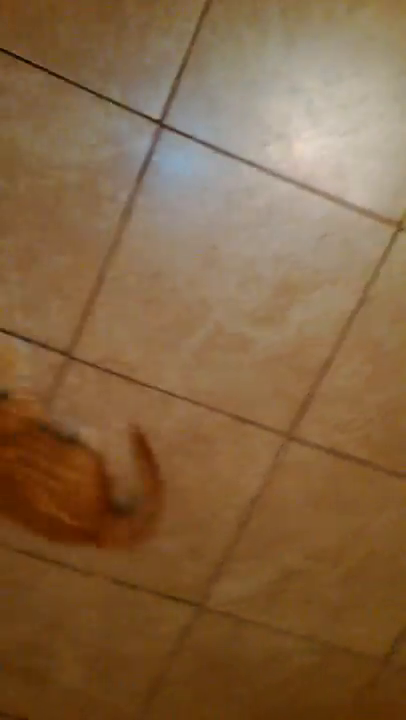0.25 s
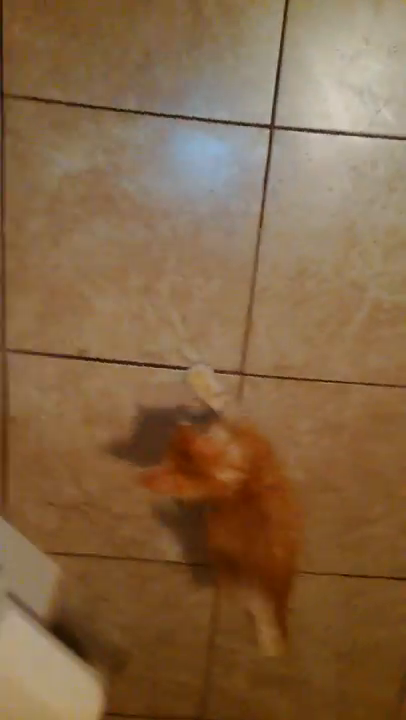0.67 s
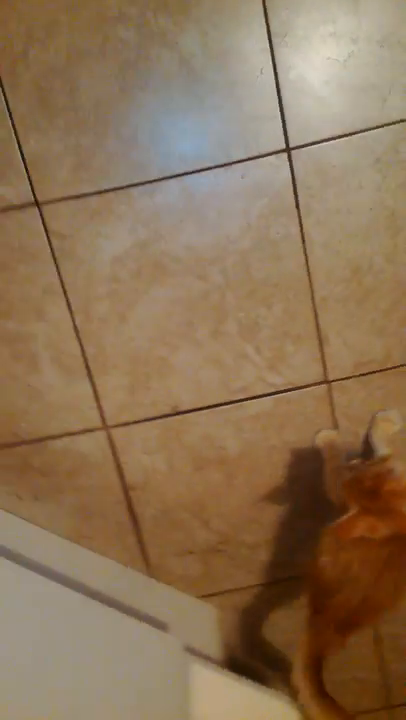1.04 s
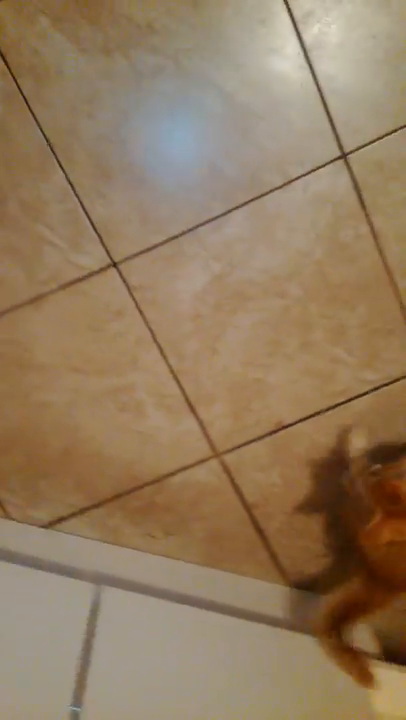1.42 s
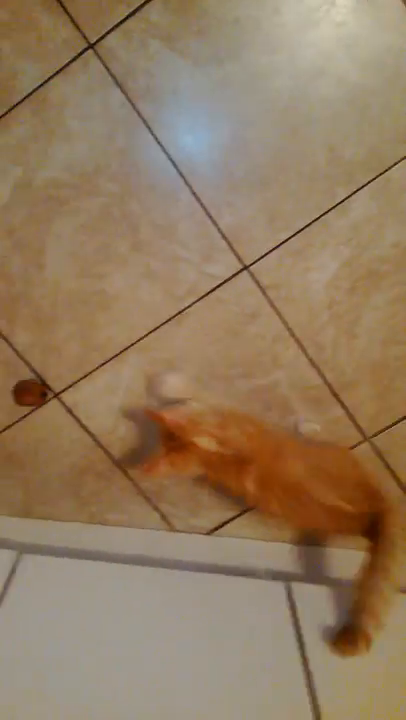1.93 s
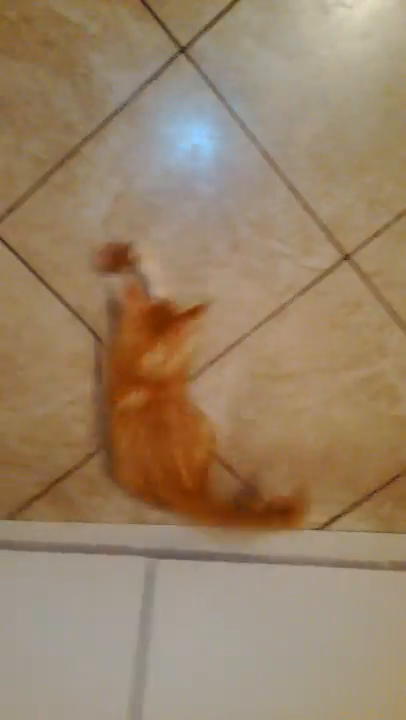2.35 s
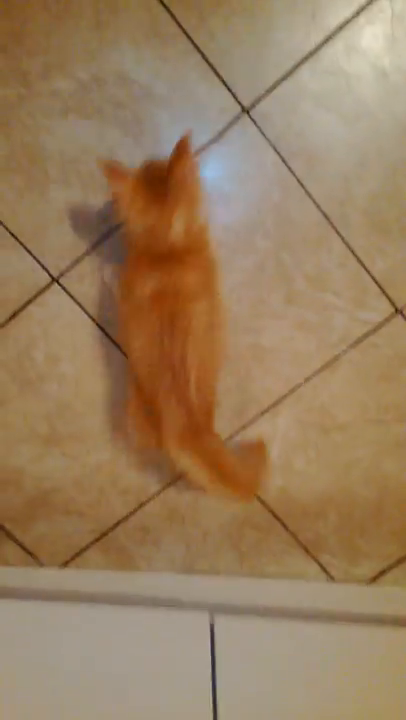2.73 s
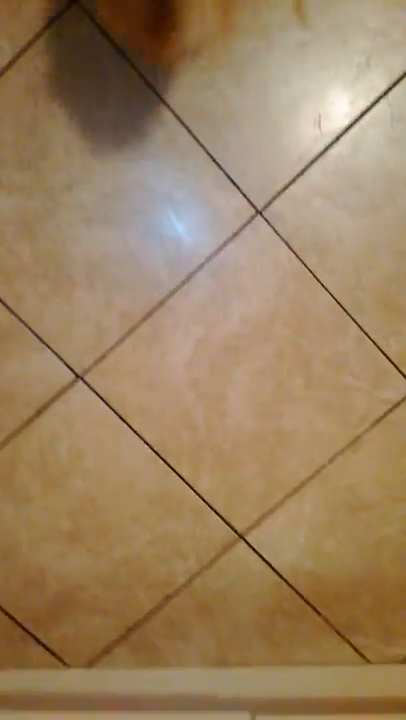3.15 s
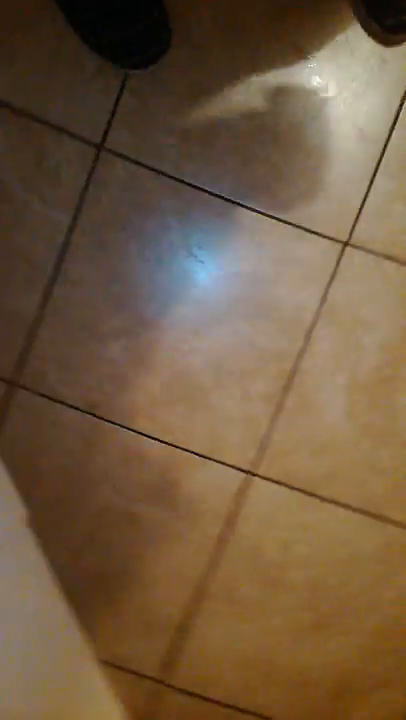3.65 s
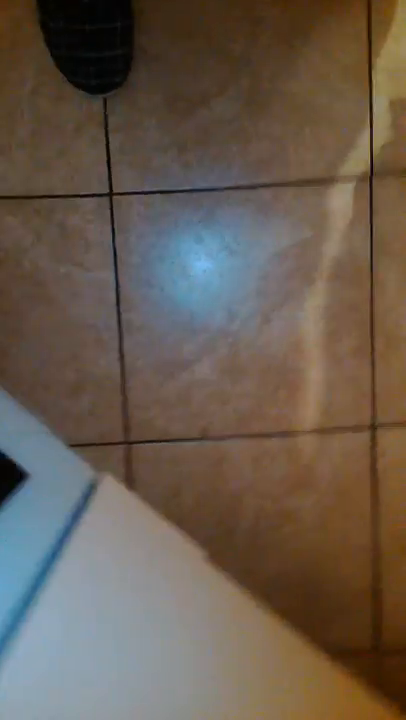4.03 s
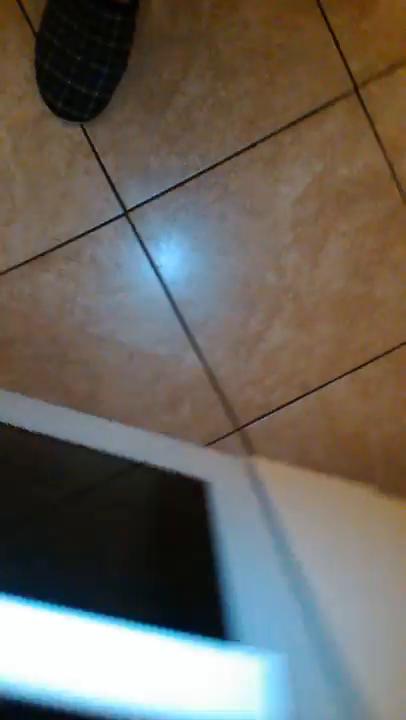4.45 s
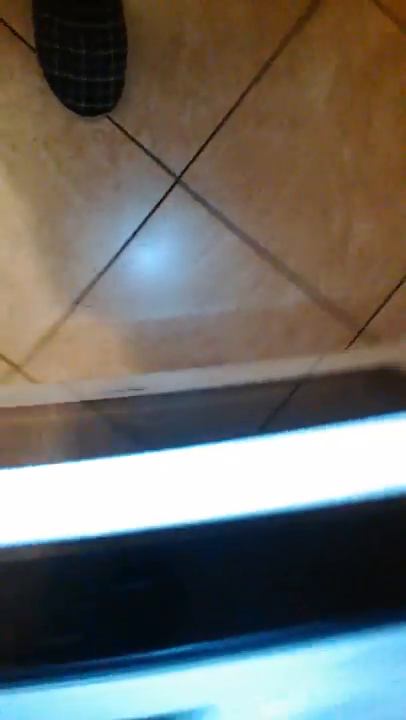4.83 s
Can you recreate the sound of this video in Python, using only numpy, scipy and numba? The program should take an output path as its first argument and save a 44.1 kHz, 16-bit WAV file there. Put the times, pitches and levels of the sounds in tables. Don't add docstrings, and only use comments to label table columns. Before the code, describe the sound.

A hollow walnut rattles and skitters over hard kitchen tiles in bursts, knocking a door and a cabinet as a cat bats it.

```python
import sys
import numpy as np
from scipy import signal
from scipy.fft import rfft, irfft
from scipy.io import wavfile
from scipy.ndimage import uniform_filter1d
from numba import njit

SR = 44100
rng = np.random.default_rng(int(sys.argv[2]) if len(sys.argv) > 2 else 0)


def to_wav(sig):
    pcm = np.clip(np.atleast_2d(sig), -1, 1) * 32767
    pcm = np.round(pcm).astype(np.int16)
    wavfile.write(sys.argv[1], SR, pcm.T)


def invert_db(x):
    u = np.asarray(x, float) / 20
    return 10 ** u


N = 224017
T = np.arange(N) / SR

# (frequency [Hz], density [dB per Hz])
AIR = [(12, -36), (20, 4), (70, -40), (130, -47.5), (574, -32), (5530, -39), (6540, -25), (16000, -38)]
# (time [s], ridge tick level [dB], hollowness [dB], shell pitch [Hz])
ROLLS = [
    [(0.0, -29.5, -15.5, 1550), (0.07, -23.5, -5, 1920), (0.13, -23, -9, 1500), (0.26, -34, -3.5, 1705),
     (0.51, -33.5, -3, 1690), (0.67, -36.5, -11, 1560), (1.13, -37.5, -11, 1460), (1.33, -52, -8, 1493),
     (1.6, -56.5, -26, 1700)],
    [(2.27, -62, -5, 1430), (2.35, -32, -5, 1520), (2.45, -30.5, -10, 1490), (2.53, -23, -9, 1550),
     (2.68, -35, -9, 1690), (2.85, -28, -2, 1500), (3.07, -38, -7.5, 1920), (3.29, -34.5, 2.5, 1740),
     (3.64, -42.5, -5, 1850)],
    [(3.645, -42, 8.5, 1630), (3.76, -29, -52, 1530), (3.89, -28, -7.5, 1700), (4.08, -29.5, -4, 1750),
     (4.22, -35, -9, 1660), (4.34, -32, -2.5, 1680), (4.62, -38, -9.5, 1435), (4.75, -35.5, -2, 1670),
     (5.08, -39.5, -16, 1670)],
]
# (tile bed [dB], bed drift [dB/s], glaze sparkle [dB], sparkle drift [dB/s])
GROUNDS = [
    (-18.5, 4, -11.5, -5.5),
    (-17, 2, -7, -2.5),
    (-15, 6.5, -9, -6.5),
]
# (frequency [Hz], width [Hz], level [dB])
SHELL = [(1650, 230, 0)]
# (frequency [Hz], width [Hz], level [dB])
WALL = [(1365, 480, 11), (2320, 1300, 6.5), (2155, 40, -26.5), (3150, 3100, 0)]
# (frequency [Hz], width [Hz], level [dB])
TILE = [(3384, 930, -17), (4210, 690, -3.5), (5520, 1690, 0), (6560, 1210, 4), (7900, 2700, -9.5)]
# (frequency [Hz], width [Hz], level [dB])
FLOOR = [(1026, 1050, 4), (680, 320, -5.5)]
# (frequency [Hz], width [Hz], level [dB])
GLAZE = [(8670, 3000, -8), (12120, 4100, -12), (15000, 2500, -12.5)]
# (time [s], boom [dB], thud [dB])
PAWS = [(0.0, -58.5, -58), (0.165, -41, -33.5), (0.63, -64, -69), (1.03, -72.5, -57), (1.4, -75.5, -57.5),
        (1.92, -61.5, -65.5), (2.04, -64, -71), (2.321, -48.5, -85), (2.56, -55, -50), (2.7, -63.5, -60),
        (3.18, -58.5, -79), (3.34, -54, -63), (3.64, -52, -80), (3.8, -58, -48.5), (3.93, -53, -46),
        (4.05, -52.5, -59), (4.19, -61, -36), (4.43, -74, -45.5), (4.571, -60.5, -38), (4.71, -68, -45.5),
        (5.06, -78, -48.5)]
# (time [s], strength [dB], hollowness [dB], tile bed [dB], contact blur [0-1])
THUMPS = [(0.003, -40.5, -17, 3.5, 0.05), (0.1381, -22.5, 8.5, -1.5, 0.5), (0.2246, -28, -30, -7, 0.8),
          (0.7909, -32.5, -4, -1.5, 0.63), (2.2156, -33.5, -3, -2, 1), (3.6028, -37, 1.5, -8, 0.73),
          (3.6715, -38, -16, -3, 0.66), (3.703, -36.5, 6, 4.5, 0.63), (3.976, -39, -26, 11, 0.62),
          (3.995, -39, 0.5, 11.5, 0.63), (4.042, -38.5, -8, 12, 1), (4.1538, -16.5, -6, -5, 0.57),
          (4.3053, -49.5, 18.5, 21.5, 1), (4.427, -40, 13, 10, 0.54), (4.5551, -21.5, 1, -2, 0.45),
          (4.5956, -59.5, 10, 31, 0.46), (4.7252, -34, -33, 0, 0.47), (4.8065, -42.5, 12, 10.5, 0.54),
          (4.9528, -43, 9, 12, 0.5), (5.0664, -40.5, -14, 5, 0.46)]
# (time [s], strength [dB], hollowness [dB], contact blur [0-1])
BOUNCES = [(0.2372, -27.5, 4, 0.66), (0.801, -41, 10.5, 0.67), (0.9156, -40, 11.5, 0.24),
           (2.2307, -28.5, -3.5, 0.83), (2.2616, -24.5, 2.5, 0.84), (2.466, -22, -16, 1),
           (2.5457, -18.5, 0.5, 0.75), (2.568, -25, 1, 0.73), (3.6304, -46, 13.5, 0.75),
           (3.718, -27.5, 5.5, 0.7), (3.7362, -26, 3.5, 0.4), (3.8217, -22.5, 0.5, 0.85),
           (3.921, -25, -9.5, 0.6), (4.1091, -36, 9, 0.58), (4.8324, -39, 5.5, 0.96)]
# (time [s], peak level [dB])
DOOR_KNOCKS = [
    (0.137, -13.5),
    (0.223, -44),
]
# (frequency [Hz], width [Hz], level [dB])
DOOR = [(166, 51, -12), (246.4, 41, -10), (358, 90, -7), (551, 139, -3.5), (634, 390, -11.5),
        (1070, 1200, -18.5)]
# (time [s], peak level [dB])
PANEL_KNOCKS = [
    (4.153, -14.5),
    (4.199, -39),
    (4.324, -33),
    (4.428, -36.5),
    (4.555, -41.5),
    (4.594, -36.5),
]
# (frequency [Hz], width [Hz], level [dB])
PANEL = [(226, 28, -7), (332, 135, -6.5), (472, 60, 1.5), (562, 82, 3.5), (730, 183, -1), (910, 270, -5.5),
         (1323, 370, -7.5)]
# (time [s], strength [dB], hollowness [dB], brightness [dB], contact blur [0-1])
HOPS = [(0.4245, -37, -9, -2, 0.2), (0.4336, -29.5, 4, -20, 0.53), (0.6838, -25, -10, -12, 0.22),
        (0.6944, -28.5, -3, -13, 0.73), (2.3566, -28, -1.5, -30, 0.52), (2.4635, -22.5, -7.5, -10, 0.6),
        (2.5532, -18, -3, -4, 0.36), (2.6055, -11, -9, -11, 0.2), (2.6645, -13, -12.5, -15, 0.28),
        (2.6768, -28, 2, -6, 0), (2.715, -14.5, -4.5, -10.5, 0.25), (2.7707, -26, -3, -14, 0.4),
        (2.7955, -12, -6, -32, 0.31), (2.8134, -46, 7, -8, 0.6), (2.821, -46, 19, -4, 1),
        (2.872, -41, -17, 8, 0.3), (3.076, -40, 7, 0, 0.4), (3.0939, -32, 1.5, -24, 0.29),
        (3.1613, -29.5, 1.5, -17.5, 0.01), (3.1847, -36, 7, -27, 0.24), (3.2628, -26, -3, -34, 0.11),
        (3.2923, -24, -5, -15, 0.33), (3.3399, -26, -6, -15, 1)]
# (time [s], level [dB], contact blur [0-1])
CLAWS = [
    (2.474, -25.5, 0.54),
    (2.4765, -35, 0.7),
    (2.4834, -28, 0.7),
    (3.723, -27.5, 0.8),
    (3.747, -30, 0.6),
    (3.92, -23, 0.73),
    (3.95, -27, 1),
]
# (time [s], level [dB])
SLIDE = [
    (1.55, -60.5),
    (1.7, -58),
    (1.802, -47.5),
    (1.916, -41.5),
    (2.01, -58.5),
    (2.1, -91),
]
# (frequency [Hz], density [dB per Hz])
SKID = [(180, -46), (400, -30), (842, -11), (1510, -19.5), (2250, -12.5), (2700, -21), (6620, -2),
        (16000, -26.5)]
# (frequency [Hz], decay time t60 [s])
KITCHEN = [(150, 0.48), (500, 0.37), (1500, 0.56), (4000, 0.57), (8000, 0.34), (14000, 0.2)]


def unit(x):
    return x / np.sqrt(np.mean(x ** 2))


@njit
def svf(x, hz, width):
    y, b, l = np.empty(len(x)), 0., 0.
    for i in range(len(x)):
        g = np.tan(np.pi * hz[i] / SR)
        k = width / hz[i]
        v = (b + g * (x[i] - l)) / (1 + g * (g + k))
        b, l = 2 * v - b, l + 2 * g * v
        y[i] = k * v
    return y


def body(x, modes, tune=1):
    ones = np.ones(len(x))
    out = 0
    power = 0
    for k, (hz, width, db) in enumerate(modes):
        mode = svf(x + 1e-18, hz * tune * ones, 1. * width)
        out = out + (-1) ** k * invert_db(db) * mode
        power += invert_db(db) ** 2 * np.pi * width / SR
    return out / np.sqrt(power)


def hiss(points):
    hz, db = np.transpose(points)
    f = np.maximum(np.arange(N // 2 + 1) * SR / N, 1)
    weight = invert_db(np.interp(np.log(f), np.log(hz), db))
    return unit(irfft(rfft(rng.standard_normal(N)) * weight, N))


def walk(rate):
    k = int(SR / rate)
    return unit(uniform_filter1d(uniform_filter1d(rng.standard_normal(N), k), k))


def played(table, column):
    rows = np.array(table)
    return invert_db(np.interp(T, rows[:, 0], rows[:, column], left=-120, right=-120))


def room_air():
    return invert_db(-63 + 0.5 * walk(3)) * hiss(AIR)


def handling():
    return invert_db(-70 + 3.5 * walk(3.7)) * unit(body(rng.standard_normal(N), [(31.9, 45, 0)]))


def ticks(rate, scatter_db):
    hit = rng.random(N) < rate / SR
    size = np.minimum(rng.exponential(size=N), 4)
    return unit(hit * invert_db(scatter_db * size) * rng.choice([-1, 1], size=N))


def shell(x):
    s, _, _, hz = np.concatenate(ROLLS).T
    pitch = np.interp(T, s, hz) * (1 + 0.059 * walk(27))
    hollow = body(x, SHELL, np.clip(pitch / SHELL[0][0], .6, 1.6))
    ring = hollow + invert_db(-9.0) * body(x, WALL)
    return signal.sosfilt(signal.butter(2, 850, "high", fs=SR, output="sos"), ring)


def clink(x):
    return signal.sosfilt(signal.butter(2, 9500, fs=SR, output="sos"), body(x, TILE))


def dull(x):
    return body(body(x, FLOOR), [(937, 1880, 0)]) / 2


def rolling():
    grit = ticks(2000, 2.8) * invert_db(1.5 * walk(40))
    ring = sizzle = rumble = sparkle = 0
    for roll, (bed_db, drift, glaze_db, fade) in zip(ROLLS, GROUNDS):
        gain = played(roll, 1)
        age = T - roll[0][0]
        s, _, hollow_db, _ = np.transpose(roll)
        sizzle = sizzle + gain
        ring = ring + gain * invert_db(np.interp(T, s, hollow_db))
        rumble = rumble + gain * invert_db(bed_db + drift * age)
        sparkle = sparkle + gain * invert_db(glaze_db + fade * age)
    nut = ring * shell(grit)
    tile = sizzle * clink(grit) + rumble * dull(grit) + sparkle * body(grit, GLAZE)
    return invert_db(-6.5) * (nut + tile)


def steps(column):
    rise_db_s, fall_db_s = 501.5, 119.5
    out = 0
    for row in PAWS:
        slope = np.where(T < row[0], rise_db_s, fall_db_s)
        out = out + invert_db(row[column] - slope * abs(T - row[0]))
    return out


def footfalls():
    boom = steps(1) * unit(body(rng.standard_normal(N), [(102.3, 12, 0)]))
    thud = invert_db(-5.5) * steps(2) * unit(body(rng.standard_normal(N), [(207.5, 42, 4.0), (290, 340, -6.0)]))
    jolt = invert_db(-6.0) * steps(1) * unit(body(rng.standard_normal(N), [(52, 30, 0)]))
    return boom + thud + jolt


def layers(rows):
    s, db, hollow_db, third_db, blur = np.transpose(rows)
    return s, invert_db(np.transpose([db, db + hollow_db, db + third_db])), blur


def taps(times, gains, blurs, crisp=0):
    touch_s = 0.0004
    t = np.arange(SR // 8) / SR
    chatter = rng.standard_normal((len(times), len(t)))
    push = np.zeros((gains.shape[1], N + len(t)))
    for s, gain, blur, noise in zip(times, gains, np.clip(blurs, 0, 1), chatter):
        length = touch_s + 0.022 * blur ** 2
        tap = noise * np.exp(-t / length) * (1 - np.exp(-t / (0.24 * length)))
        tap = tap / np.sqrt(np.sum(tap ** 2)) + crisp * (t == 0)
        start = int(s * SR)
        push[:, start:start + len(t)] += gain[:, None] * tap
    return push[:, :N]


def bounces():
    firm_bed_db = -20.5
    firm = [(s, db, hollow_db, firm_bed_db, blur) for s, db, hollow_db, blur in BOUNCES]
    tile, ring, bed = taps(*layers(firm + THUMPS))
    nut = invert_db(20.0) * shell(ring)
    return nut + invert_db(27) * clink(tile) + invert_db(8) * body(tile, GLAZE) + invert_db(20.5) * dull(bed)


def knocks(table, modes, blur, low_hz):
    rows = np.array(table)
    push = taps(rows[:, 0], invert_db(rows[:, 1:]), blur + 0 * rows[:, 0], crisp=2.56)[0]
    high_pass = signal.butter(2, low_hz, "high", fs=SR, output="sos")
    return invert_db(18.5) * signal.sosfilt(high_pass, body(push, modes))


def door():
    return knocks(DOOR_KNOCKS, DOOR, blur=0.1, low_hz=133.7)


def hops():
    rest_s, period_s = 1.3616, .0166
    rock_db, change_db = -47, 0.9
    rocks = [(rest_s + k * period_s, rock_db + k * change_db, -8.5, -22.5, 0.3) for k in range(4)]
    claws = [(s, db, -10.5, 0.5, blur) for s, db, blur in CLAWS]
    tile, ring, glaze = taps(*layers(HOPS + rocks + claws), crisp=0.29)
    return invert_db(19.5) * shell(ring) + invert_db(23.5) * clink(tile) + invert_db(19.5) * body(glaze, GLAZE)


def paw_skid():
    return invert_db(-4.0) * played(SLIDE, 1) * hiss(SKID) * invert_db(1.03 * walk(30))


def panel():
    return knocks(PANEL_KNOCKS, PANEL, blur=0.062, low_hz=184)


def kitchen(x, wet_db):
    gap_s, build_s, count = 0.00054, 0.0017, 5
    t = np.arange(SR * 3 // 4) / SR
    noise = rfft(rng.standard_normal((count, len(t))))
    f = np.log(np.maximum(np.arange(noise.shape[1]) * SR / len(t), 1))
    hz, t60 = np.transpose(KITCHEN)
    tails = 0
    for row, decay_s in zip(np.eye(len(hz)), t60):
        band = irfft(noise * np.interp(f, np.log(hz), row), len(t))
        tails = tails + band * invert_db(-60 * t / decay_s) / np.sqrt(decay_s)
    tails = tails * (1 - np.exp(-np.maximum(t - gap_s, 0) / build_s))
    place = (T * 6 - np.arange(count)[:, None]) % count - 1
    share = np.cos(np.pi / 2 * np.clip(place, -1, 1))
    wet = signal.fftconvolve(x * share, tails, axes=1)[:, :N].sum(axis=0)
    lead = SR // 10
    wet[:len(t) - 1] += signal.fftconvolve(x[lead:0:-1], tails[0])[lead:]
    return x + invert_db(wet_db) * wet / np.sqrt(np.sum(tails ** 2) / count)


def scene():
    background = room_air() + handling()
    sliding = kitchen(rolling() + paw_skid(), wet_db=-3.5)
    struck = kitchen(bounces() + door() + panel(), wet_db=1.5)
    crisp = kitchen(hops(), wet_db=-0.5)
    return (sliding + struck + crisp + footfalls() + background)[None]


def band_limit(x):
    return signal.sosfilt(signal.butter(12, 16800, fs=SR, output="sos"), x)


def record(dry):
    top_hz = 15750
    cut = signal.sosfilt(signal.ellip(14, .3, 80, top_hz, fs=SR, output="sos"), dry)
    return band_limit(cut)


dry = scene()
out = record(dry)
to_wav(out)
```